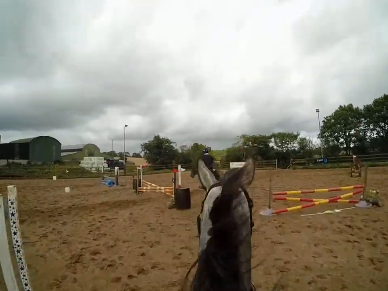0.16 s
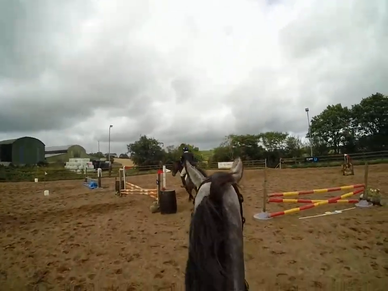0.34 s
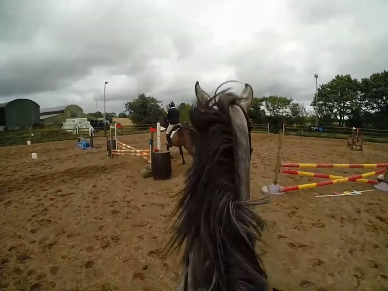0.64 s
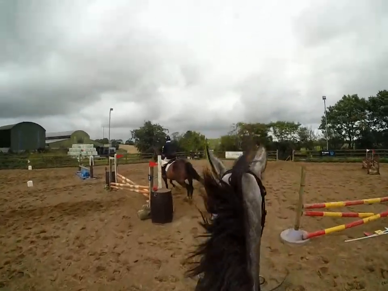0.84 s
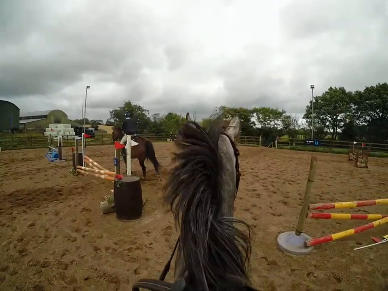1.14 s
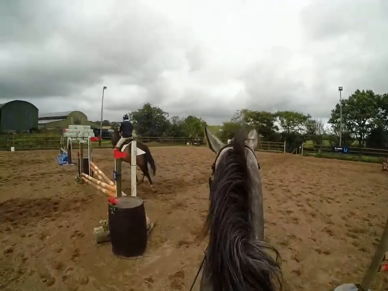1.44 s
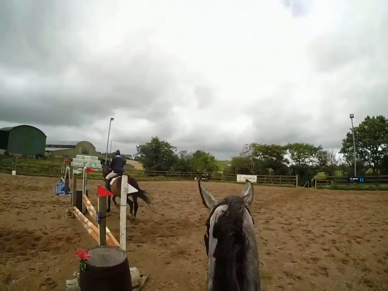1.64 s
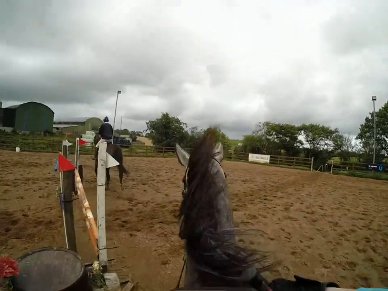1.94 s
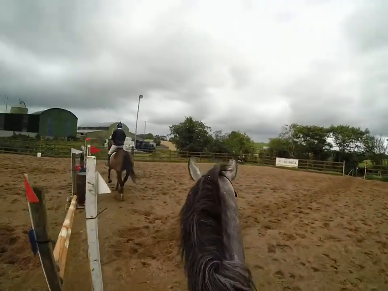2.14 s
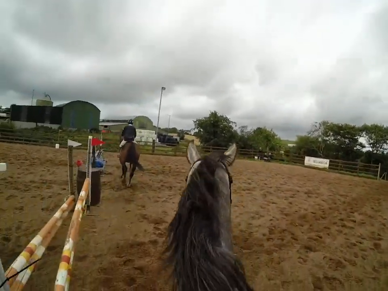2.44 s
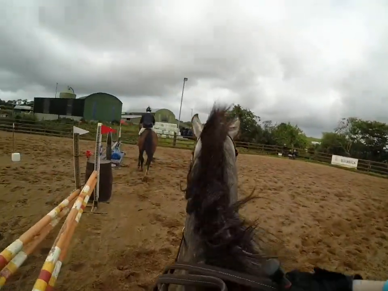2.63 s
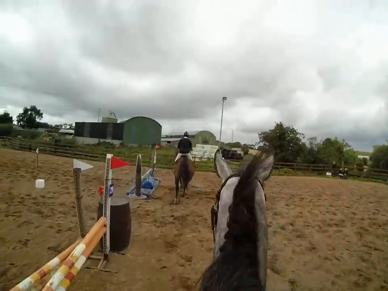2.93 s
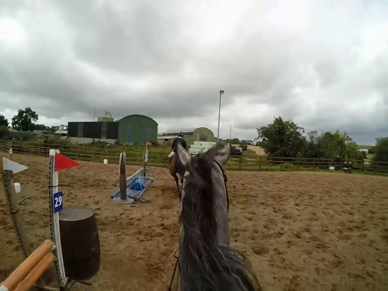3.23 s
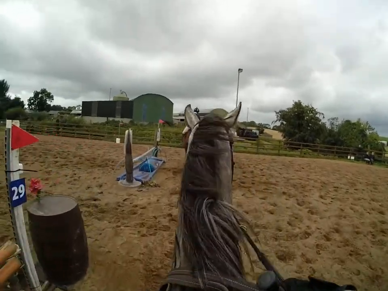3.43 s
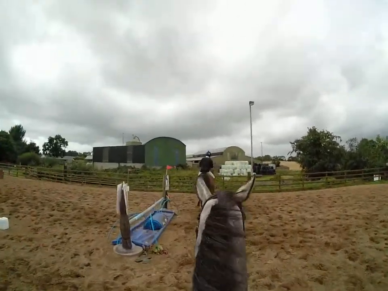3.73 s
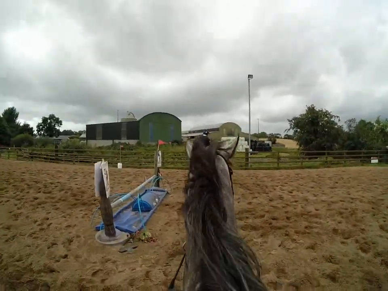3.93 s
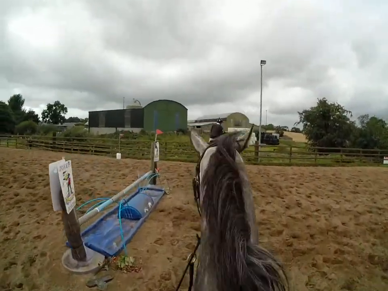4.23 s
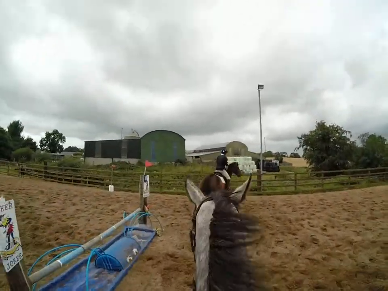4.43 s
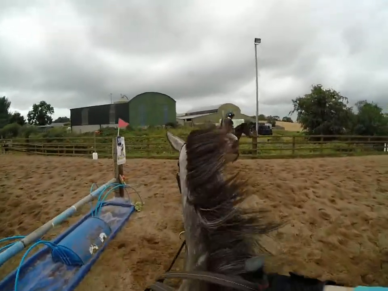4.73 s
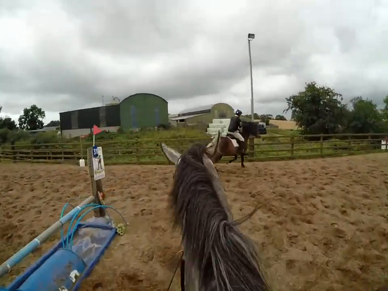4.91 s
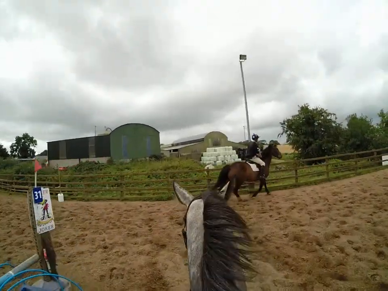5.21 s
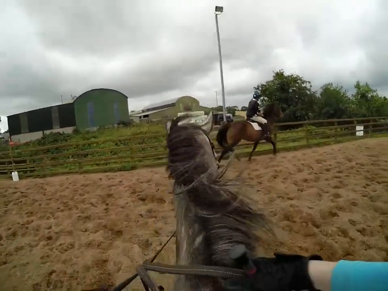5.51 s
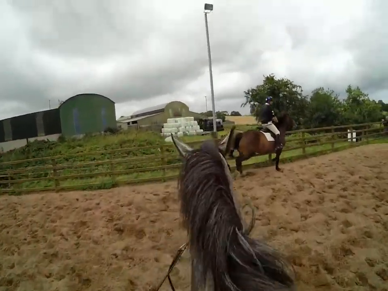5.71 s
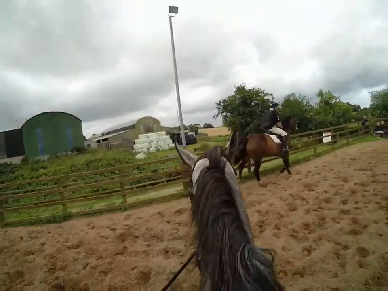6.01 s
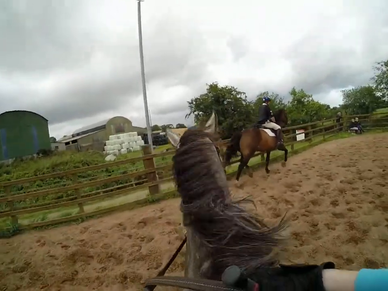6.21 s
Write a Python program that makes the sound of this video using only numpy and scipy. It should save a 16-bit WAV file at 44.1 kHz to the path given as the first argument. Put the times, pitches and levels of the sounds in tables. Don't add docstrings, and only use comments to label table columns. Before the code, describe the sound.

Very close, dry handling noise from a body-worn microphone shut in plastic during a steady canter. Each stride brings a low membrane-shaking thump with coarse strap rubbing, then a hard bright plastic snap midway to the next. Light irregular ticks, duller knocks, short cloth scuffs and tiny rattles fill the gaps. Subsonic-feeling rumble and quiet hiss continue throughout, the outdoor arena itself barely audible, with the rhythm running unchanged to an abrupt end.

```python
import sys
import numpy as np
from scipy import signal
from scipy.fft import rfft, irfft
from scipy.io import wavfile
from scipy.ndimage import uniform_filter1d

SR = 44100
rng = np.random.default_rng(int(sys.argv[2]) if len(sys.argv) > 2 else 0)


def volts(x):
    e = np.asarray(x, float) / 20
    return 10 ** e


def digitize_waveform(pressure):
    field = np.atleast_2d(pressure).T
    bounded = np.clip(field, -1, 1)
    quanta = np.round(bounded * 32767).astype(np.int16)
    wavfile.write(sys.argv[1], SR, quanta)


N = 280476

# (frequency [Hz], density [dB per Hz])
HISS = [(100, -1.5), (300, -8.5), (400, -17.5), (630, -21.5), (800, -25), (1260, -24.5), (2250, -24),
        (3100, -30), (6100, -37), (8000, -41.5), (10000, -45), (13000, -49.5), (15000, -53)]
# (frequency [Hz], density [dB per Hz])
RUMBLE = [(15, 3), (27, -3.5), (80, -1), (130, -8), (300, -21.5), (500, -63.5)]
# (time [s], level [dB])
SWAY = [(0.04, -30.5), (0.18, -40), (0.39, -37.5), (0.58, -34), (0.95, -39), (1.43, -35), (1.78, -41.5),
        (1.94, -40.5), (2.15, -38.5), (2.76, -42), (2.88, -37.5), (4.54, -41), (5.06, -42.5), (5.27, -39.5),
        (5.65, -39), (6.0, -43), (6.21, -40), (6.3, -31.5)]

# (frequency [Hz], width [Hz], level [dB])
BODY_MODES = [(200, 170, 1.5), (291.4, 85.6, -3.5)]
SHELL_MODES = [(427, 244, 2), (634.3, 138, 1), (803, 230, -5.5), (1040, 268, -8.5)]
BRIGHT_MODES = [(1452, 140, 1), (1693, 720, 24), (2240, 208, 19), (2800, 220, 10)]
EDGE_MODES = [(3740, 380, -12), (4050, 590, -19.5), (4243, 580, 1), (5040, 1400, -0.5), (6050, 340, -10),
              (7550, 1440, -10.5), (10300, 6700, -5.5), (13200, 4200, -30.5)]

# (time [s], length [s], level [dB])
RATTLES = [(.14, 0.015, -52.5), (0.636, .03, -59), (1.345, 0.025, -50.5), (2.063, 0.0095, -27),
           (2.757, 0.0081, -40), (3.434, 0.024, -48.5), (4.095, 0.038, -52.5), (4.487, 0.017, -43.5),
           (4.836, 0.032, -53.5), (5.587, 0.0069, -38.5), (6.311, 0.0082, -56)]
# (time [s], length [s], pressure [dB])
RUBS = [(0.042, 0.041, -34), (0.102, 0.055, -39.5), (0.596, 0.068, -32), (0.728, 0.056, -35),
        (1.302, 0.044, -29), (1.43, 0.067, -32), (2.021, 0.018, -29), (2.056, 0.015, -21),
        (2.131, 0.062, -31), (2.701, 0.049, -28), (2.824, 0.045, -30.5), (3.395, 0.043, -33),
        (3.538, 0.029, -37.5), (4.065, 0.057, -33.5), (4.213, 0.094, -32.5), (4.632, 0.035, -44),
        (4.792, 0.048, -30.5), (4.941, 0.063, -32), (5.24, 0.11, -44), (5.509, 0.072, -29),
        (5.616, 0.038, -37), (5.675, 0.031, -32.5), (5.759, 0.024, -41), (5.883, 0.057, -36),
        (6.187, 0.014, -46), (6.276, 0.024, -29)]
# (time [s], pressure [dB], crispness [dB])
SCUFFS = [(.209, -53, -22), (.34, -35, 3), (.423, -51, -20), (0.48, -32.5, -15), (.285, -38, 1),
          (0.552, -43, 2.5), (0.584, -42, 2), (0.881, -37, 4), (1.186, -35, -7), (1.667, -34.5, -1.5),
          (1.774, -46, 0), (1.971, -38.5, -6), (2.541, -54, 4), (2.574, -38.5, 0.5), (2.68, -35, -7),
          (2.922, -38, -7), (3.027, -56, 10), (3.165, -36, 3.5), (3.295, -39.5, 8.5), (3.489, -44, -5),
          (3.601, -43.5, 5), (3.882, -33, -2), (4.375, -39, -9), (4.451, -39.5, 2), (4.575, -56, -6),
          (4.896, -29.5, -12), (5.038, -45.5, 13), (5.966, -37, 5.5), (6.166, -58, 18.5)]

# (time [s], peak [dB], strongest mode [Hz], edge [dB])
SNAPS = [
    (0.3239, -21, 1790, 9),
    (1.0119, -14.5, 2250, 2.5),
    (1.707, -15, 2240, 0),
    (2.387, -15.5, 2150, 0.5),
    (3.1066, -14.5, 2230, 2.5),
    (3.775, -16.5, 1834, -2),
    (4.4982, -13.5, 2080, 2.5),
    (5.222, -13, 2110, 2),
]
# (time [s], peak [dB], dent [dB], edge [dB])
KNOCKS = [(0.3461, -27, -3, -7), (0.8806, -40, 8.5, -3), (1.2231, -25, 4, -4.5), (2.36, -45, 0, -1),
          (2.485, -46, -12, 15), (2.505, -43, -0.5, -1), (2.95, -47, 3.5, 6), (3.315, -26.5, 0.5, -3.5),
          (3.605, -45, 4, -7), (4.6463, -43.5, -13, -1), (5.1902, -39, 2.5, 1), (5.4016, -40, -4, -14),
          (5.5127, -27, -4, 0), (5.7239, -40.5, 7, -2), (5.7542, -36.5, -3, -4), (6.1913, -31, 2, 0)]
# (time [s], peak [dB], dent [dB])
TICKS = [(0.164, -37, 0), (0.2168, -42, 7), (.2548, -38.5, -3), (.3032, -45, 2), (0.4565, -43, 0),
         (0.812, -42, 2.5), (.9134, -45, 6), (0.9499, -39, 1.5), (0.9835, -41, 5.5), (1.047, -35.5, -1),
         (1.1497, -43.5, 5), (1.2935, -41.5, -11), (1.667, -38.5, -3), (2.371, -37, 1), (2.924, -34.5, -3),
         (3.0727, -32.5, 1.5), (3.096, -34, 5), (3.1725, -36.5, 5.5), (3.729, -37, -2), (3.7621, -35.5, 7),
         (3.8597, -44, 6), (4.4798, -30, 1.5), (4.79, -34, -5), (5.0477, -36.5, -1), (5.165, -42, 2),
         (5.208, -31.5, 2.5), (5.375, -43, -15), (5.866, -45, -5), (5.944, -31.5, 0), (5.977, -41.5, 13)]

# (time [s], peak [dB], pitch [Hz], width [s])
LANDINGS = [
    (0.012, -28, 29.8, 0.06),
    (.664, -16.5, 37.2, 0.09),
    (1.368, -15, 42, 0.038),
    (2.059, -11, 45.4, .03),
    (2.759, -12.5, 43, 0.022),
    (3.46, -18, 49, 0.033),
    (4.144, -17, 44.3, 0.063),
    (4.864, -17.5, 41.6, 0.097),
    (5.586, -13.5, 43.7, 0.085),
    (6.335, -18, 40.2, 0.015),
]
# (time [s], peak [dB], pitch [Hz])
BUMPS = [(0.07, -18, 61.5), (0.088, -23, 69), (0.165, -18.5, 35), (0.433, -40, 63), (0.532, -23.5, 53.5),
         (0.616, -17.5, 76), (.773, -34, 70), (0.894, -24.5, 64), (1.239, -22.5, 64), (1.336, -27, 59.6),
         (1.603, -22, 67), (1.977, -18.5, 200), (2.083, -8.5, 75.6), (2.338, -29, 46), (2.484, -25, 37),
         (2.678, -26.5, 53), (2.865, -22, 90), (3.053, -25, 42.8), (3.238, -38, 39), (3.389, -20.5, 74.6),
         (3.748, -21.5, 71), (4.194, -22.5, 65), (4.384, -28, 151), (4.48, -20, 69.5), (4.821, -18.5, 96.5),
         (4.886, -17.5, 99), (5.193, -18, 57), (5.529, -27, 96), (5.923, -20.5, 73), (6.258, -23, 44.3)]


def evened(x):
    return x / np.sqrt(np.mean(x ** 2) + 1e-20)


def add(mix, s, sound):
    at = round(s * SR)
    part, sound = mix[max(at, 0):], sound[max(-at, 0):]
    part[:len(sound)] += sound[:len(part)]


def ring(modes):
    t = np.arange(2000) / SR
    response = np.zeros(len(t))
    for k, (hz, width_hz, db) in enumerate(modes):
        decay = np.sqrt(width_hz) * np.exp(-np.pi * width_hz * t)
        onset = 1 - np.exp(-0.35 * hz * t)
        response += (-1) ** k * volts(db) * decay * onset * np.sin(2 * np.pi * hz * t)
    return response / np.linalg.norm(response)


def coloured(points):
    hz, db = np.transpose(points)
    f = np.fft.rfftfreq(N, 1 / SR)
    gain = volts(np.interp(np.log(f + 1), np.log(hz), db))
    return evened(irfft(rfft(rng.standard_normal(N)) * gain, N))


def grit(per_s, spread_db, smooth):
    size = volts(spread_db * np.minimum(rng.exponential(1, N), 4)) * rng.choice([-1., 1.], N)
    clicks = evened(size * (rng.random(N) < per_s / SR))
    return evened(clicks + smooth * rng.standard_normal(N))


def stroke(length, rise, fall):
    t = np.arange(-3 * rise, length + 6 * fall, 1 / SR)
    return np.exp(np.minimum(t, 0) / rise - np.maximum(t - length, 0) / fall)


def hiss():
    return volts(-50) * coloured(HISS)


def sway():
    level_db = np.interp(np.arange(N) / SR, *np.transpose(SWAY))
    lumps_db = 5.15 * np.tanh(evened(uniform_filter1d(rng.standard_normal(N), 1500)))
    lumps = volts(lumps_db)
    rumble = volts(level_db + 3.5) * evened(lumps * coloured(RUMBLE))

    case = ring(BRIGHT_MODES) + 2.7 * ring(SHELL_MODES) + 0.31 * ring(EDGE_MODES)
    drift = uniform_filter1d(uniform_filter1d(rng.standard_normal(N), 3000), 2000)
    patches = volts(2.5 * evened(drift))
    cloth = patches * lumps * grit(840, spread_db=4.5, smooth=0.28)
    rustle = evened(signal.oaconvolve(cloth, case)[:N])
    rustle_db = -59 + 0.56 * (level_db - level_db.mean())
    return rumble + volts(rustle_db) * rustle


def rattles():
    rows = [(s, length, db, db - 9) for s, length, db in RATTLES]
    buzz_s, buzz_db, buzz_edge_db = 0.0071, -25.5, -28.5
    rows += [(s + 0.005, buzz_s, db + buzz_db, db + buzz_db + buzz_edge_db) for s, db, *_ in SNAPS]
    bright, edge = np.zeros((2, N))
    for s, length, bright_db, edge_db in rows:
        shape = stroke(length, rise=0.005, fall=0.0049)
        add(bright, s - 0.018, volts(bright_db) * shape)
        add(edge, s - 0.018, volts(edge_db) * shape)
    chatter = grit(4000, spread_db=2.5, smooth=0.8)
    bright_ring = signal.oaconvolve(bright * chatter, ring(BRIGHT_MODES))
    edge_ring = signal.oaconvolve(edge * chatter, ring(EDGE_MODES))
    return (bright_ring + edge_ring)[:N]


def rubs():
    shell_db, rub_fizz_db, scuff_fizz_db, scuff_s = -10, -21.5, -22, 0.009
    rows = [(s, length, db, db + shell_db, db + rub_fizz_db) for s, length, db in RUBS]
    rows += [(s, scuff_s, db, db + shell_db + crisp, db + scuff_fizz_db + crisp) for s, db, crisp in SCUFFS]
    slips = grit(220, spread_db=4.5, smooth=0.087)
    # (modes, grains per second, rise [s], fall [s], share of edge modes)
    families = [(BODY_MODES, 700, 0.004, 0.006, 0), (SHELL_MODES, 1500, 0.006, 0.009, 0),
                (BRIGHT_MODES, 2000, 0.008, 0.014, 0.15)]
    out = np.zeros(N)
    for k, (modes, per_s, rise, fall, edge) in enumerate(families):
        pressure = np.zeros(N)
        for s, length, *levels_db in rows:
            add(pressure, s - 3 * rise, volts(levels_db[k]) * stroke(length, rise, fall))
        grains = 0.49 * slips + 0.64 * grit(per_s, spread_db=4.5, smooth=0.31)
        out += signal.oaconvolve(pressure * grains, ring(modes) + edge * ring(EDGE_MODES))[:N]
    return out


def taps():
    knock_hz, tick_hz = 1705, 2210
    rows = [(s, db, hz, 0, edge_db) for s, db, hz, edge_db in SNAPS]
    rows += [(s, db, knock_hz, dent_db, edge_db) for s, db, dent_db, edge_db in KNOCKS]
    rows += [(s, db, tick_hz, dent_db, 0) for s, db, dent_db in TICKS]
    rows += [(s + 0.022, db - 20.5, hz, 0, 0) for s, db, hz, _ in SNAPS]

    settle = volts(-8) * np.exp(-np.arange(N // 140) / (0.0064 * SR))
    add(settle, 0, stroke(0.002, rise=0.0003, fall=0.0008))
    settle *= np.minimum(np.arange(len(settle)) / 90, 1)
    push = np.r_[np.zeros(round(0.0013 * SR)), -np.hanning(round(0.0006 * SR))]
    dent = np.convolve(push, ring(SHELL_MODES) + 1.07 * ring(BODY_MODES))
    dent /= abs(dent).max()

    out = np.zeros(N)
    for s, db, hz, dent_db, edge_db in rows:
        drive = settle * rng.standard_normal(len(settle))
        bright = signal.oaconvolve(drive, 0.61 * ring(BRIGHT_MODES) + ring([(hz, 400, 0)]))
        edge = signal.oaconvolve(drive, ring(EDGE_MODES))
        tap = bright / abs(bright).max() + volts(edge_db - 16.5) * edge / abs(edge).max()
        softness_db = -0.13 * (db + 13.5)
        add(out, s - 0.0012, volts(db) * tap)
        add(out, s - 0.0012, volts(db + dent_db + 1 + softness_db) * dent)
    return out


def jolts():
    land = (-0.12, 2.2)
    bump = (0.16, 28)
    rows = [(*row, *land) for row in LANDINGS]
    for s, db, _, _ in LANDINGS:
        rows.append((s, db - 8.5, 25.3, 0.084, *land))
        rows.append((s - 0.0267, db + 0.5, 80, 0.0084, *bump))
    rows += [(s, db, hz, 1 / hz, *bump) for s, db, hz in BUMPS]
    rows += [(s + 0.011, db - 4.5, 73.4, 0.028, *bump) for s, db, *_ in SNAPS]
    out = np.zeros(N)
    for s, db, hz, width, phase, sink in rows:
        t = np.arange(-2 * width, 2 * width, 1 / SR)
        swing = np.cos(2 * np.pi * (hz * t * (1 - sink * t) + phase))
        add(out, s - 2 * width, volts(db) * swing * np.exp(-(t / (0.47 * width)) ** 2))
    return out


def scene():
    shaken = rattles()
    through = sway() + shaken + rubs() + taps() + jolts()
    wall = signal.butter(2, 6500, fs=SR, output="sos")
    dulled = signal.sosfilt(wall, through)
    sizzle = 0.45 * (shaken - uniform_filter1d(shaken, size=3))
    return (dulled + sizzle + hiss())[None]


def roll_off(x):
    return signal.sosfilt(signal.butter(12, 15050, fs=SR, output="sos"), x)


def record(dry):
    high = signal.butter(8, 12900, "high", fs=SR, output="sos")
    top = signal.sosfiltfilt(high, dry)
    burst, open_share = 1536, 0.7
    shut = np.repeat(rng.random(N // burst + 1) > open_share, burst)[:N]
    mix = dry - top * uniform_filter1d(shut * 1., size=400)
    return roll_off(mix)


dry = scene()
out = record(dry)
digitize_waveform(out)
```